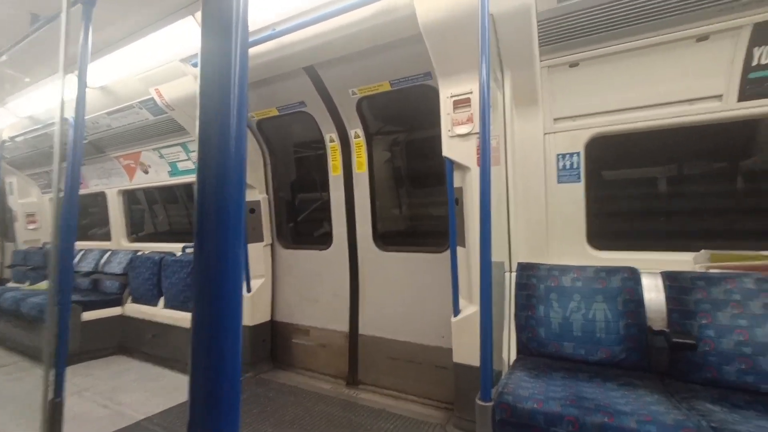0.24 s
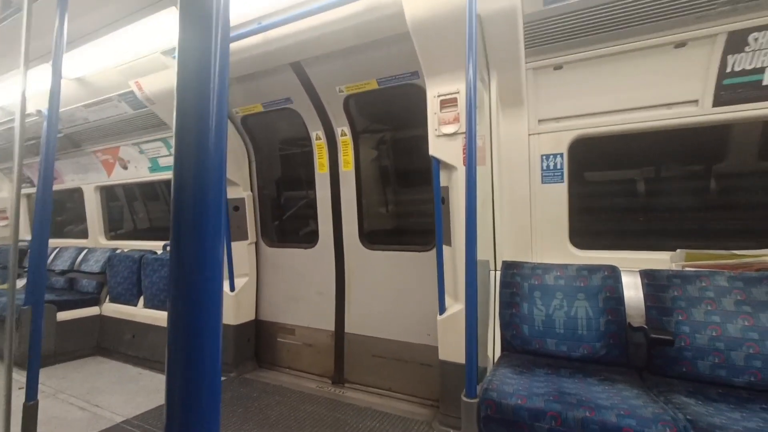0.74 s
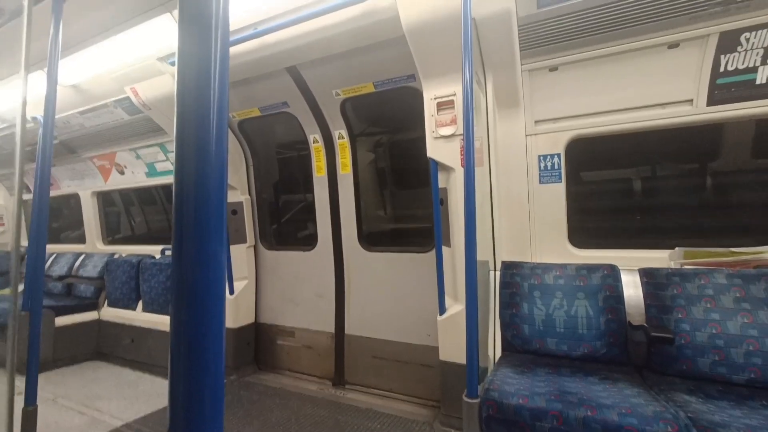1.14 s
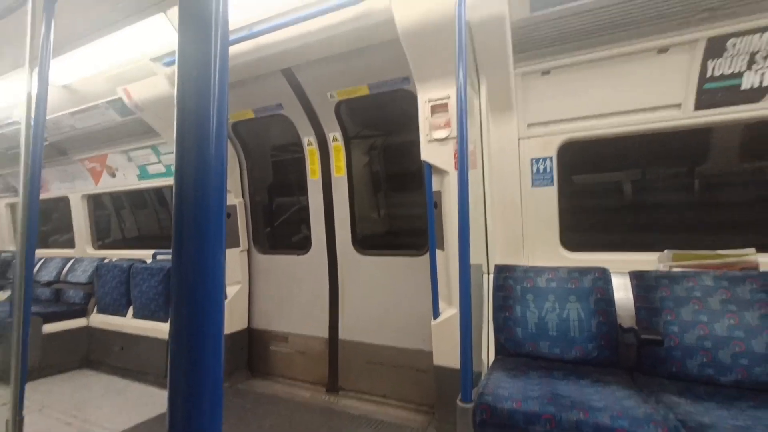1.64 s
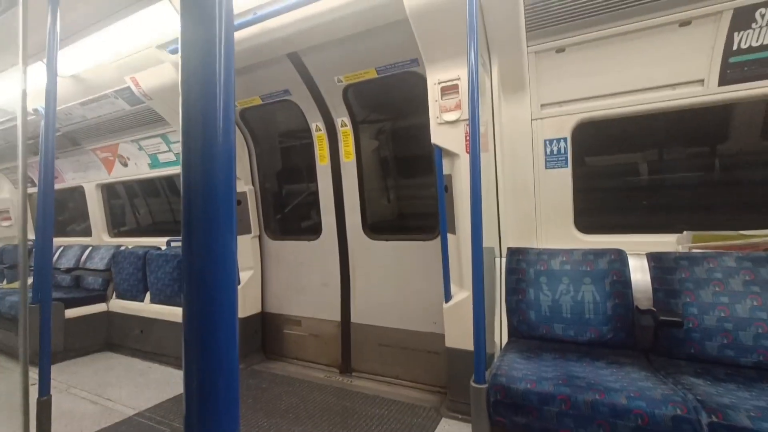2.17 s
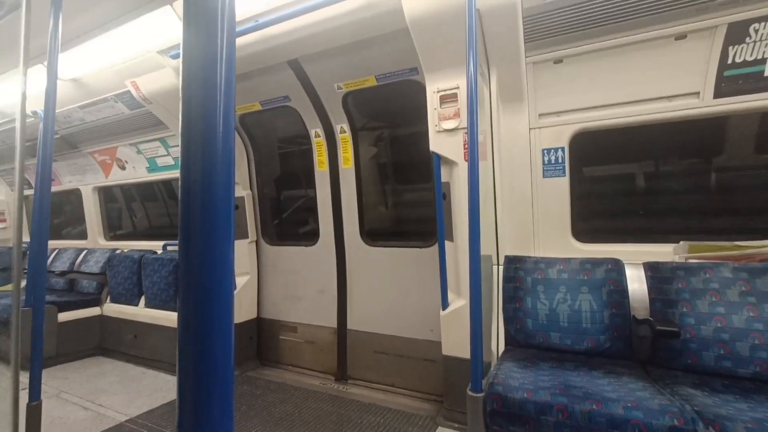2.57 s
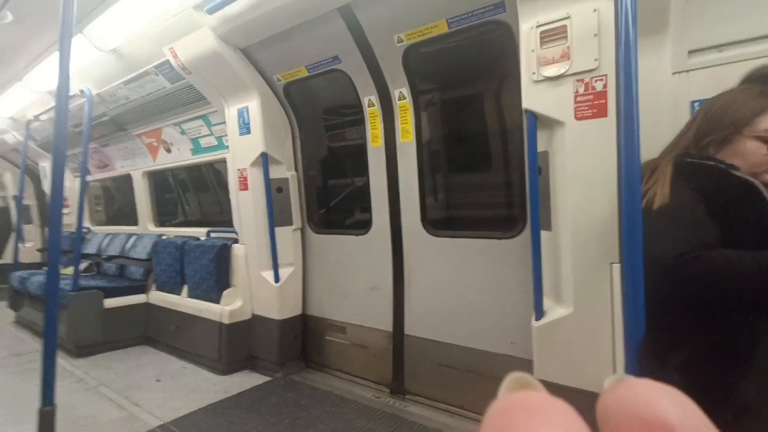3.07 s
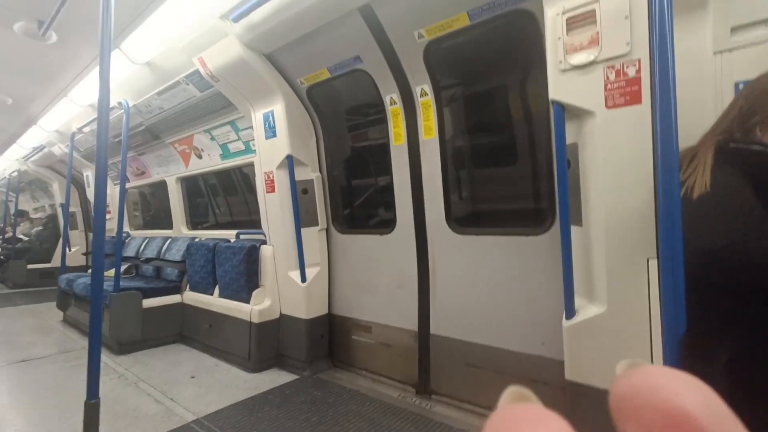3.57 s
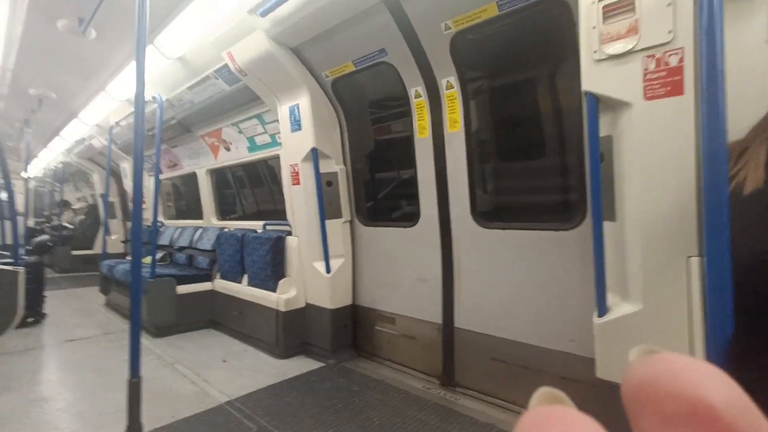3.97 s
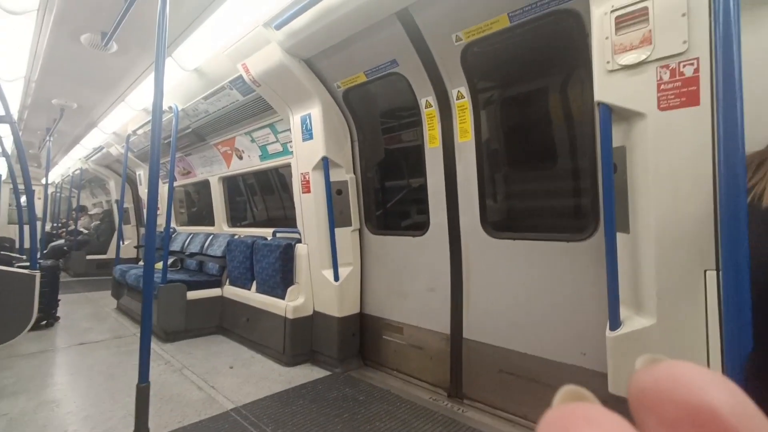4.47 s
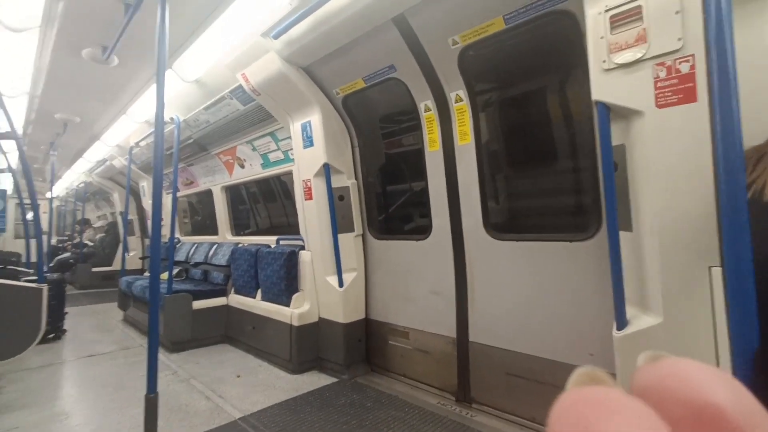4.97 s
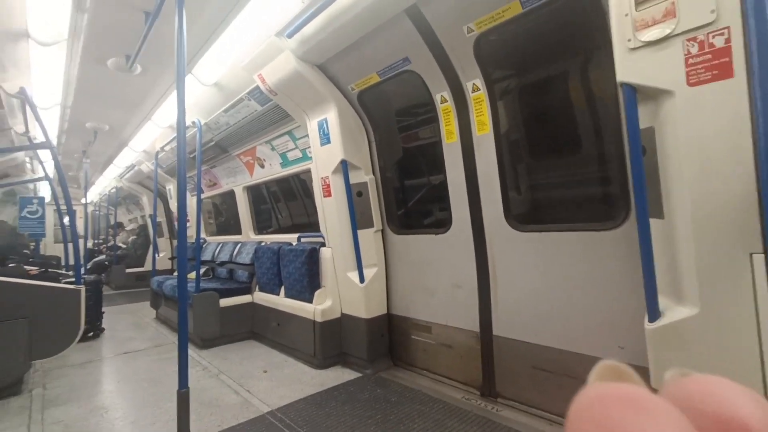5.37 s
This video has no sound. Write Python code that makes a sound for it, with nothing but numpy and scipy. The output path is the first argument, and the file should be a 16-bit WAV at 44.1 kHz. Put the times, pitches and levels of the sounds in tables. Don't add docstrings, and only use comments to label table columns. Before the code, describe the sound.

Inside an underground train carriage, a loud low rumble and tunnel roar, a sudden brief silence, then more roar with a short wheel squeal and sharp knocks.

```python
import sys
import numpy as np
from scipy import signal
from scipy.fft import rfft, irfft, next_fast_len
from scipy.io import wavfile
from scipy.ndimage import uniform_filter1d

SR = 44100
rng = np.random.default_rng(int(sys.argv[2]) if len(sys.argv) > 2 else 0)


def waveform_to_disk(signal):
    frames = np.transpose(np.atleast_2d(signal))
    scaled = np.clip(frames, -1, 1) * 32767
    samples = np.round(scaled).astype(np.int16)
    wavfile.write(sys.argv[1], SR, samples)


N = 247842

# (start [s], end [s])
STRETCHES = [
    (0, 2.7102),
    (3.1872, 5.62),
]
# (frequency [Hz], left minus right [dB])
LEFT_LEAN = [
    [(60, 0), (250, 1), (650, -1.5), (1300, 1), (3500, 0), (5500, -4), (7000, -3.5), (9500, 5), (15000, -3)],
    [(60, 0), (500, 0.5), (1300, 1.5), (3000, 1), (4800, -1), (5800, -16.5), (7200, -19), (8600, -4),
     (12200, -2), (13500, -9.5), (15000, -37)],
]
# (frequency [Hz], likeness [0 to 1])
LIKENESS = [
    [(25, 0.97), (60, 1), (130, 0.98), (290, 0.93), (640, 0.6), (1100, 0.23), (2500, 0.048), (5000, 0.073)],
    [(25, 0.995), (60, 0.95), (130, 0.98), (290, 0.91), (640, 0.52), (1100, 0.081), (2500, 0.035),
     (5000, 0.11)],
]
# (time [s], peak [dB], ring [Hz], time to fall 60 dB [s], left minus right [dB])
TICKS = [(1.7929, -46, 14100, .012, -6), (2.203, -52, 14500, .012, -6), (4.1132, -42, 11800, .045, -6),
         (5.1535, -13, 700, .012, 0), (5.3742, -16, 1000, .01, 0), (5.392, -15, 600, .012, 0),
         (5.3269, -23, 3000, .003, 0), (5.410, -14, 1900, .004, 0), (5.410, -21, 3000, .003, 0),
         (5.45813, -4.5, 1300, .0055, 0), (5.45828, -3, 2250, .003, 0), (5.4584, -13, 3300, .0025, 0),
         (5.5169, -17, 950, .008, 0), (5.5443, -18, 850, .008, 0), (4.1845, -15, 800, .012, 0),
         (5.4583, -19, 6500, .002, 0), (5.4583, -13, 4300, .0025, 0), (5.4583, -21, 9200, .0025, 3),
         (5.4583, -34, 15000, .002, 0)]


def from_db(db):
    return np.exp(np.asarray(db) * np.log(10) / 20)


def rms_one(x):
    return x / np.sqrt(np.mean(x ** 2) + 1e-20)


def in_time(rows, t):
    s, *columns = np.transpose(rows)
    return [np.interp(t, s, column) for column in columns]


def at_hz(points, hz):
    points = np.array(points)
    return np.interp(np.log(hz + 1), np.log(points[:, 0]), points[:, 1])


def drift(rate, count):
    r = np.exp(-80 * np.pi * rate / SR)
    sparse = rng.standard_normal(count // 40 + 2002)
    slow = signal.lfilter([1], [1, -2 * r, r * r], sparse)[2000:]
    return np.interp(np.arange(count) / 40, np.arange(len(slow)), rms_one(slow - slow.mean()))


def swells(rows, t):
    coarse = t[::64]
    total_db = sum(db * np.exp(-4 * ((coarse - s) / length) ** 2) for s, db, length in rows)
    return np.interp(t, coarse, total_db)


def resonate(x, hz, width_hz):
    r = np.exp(-np.pi * width_hz / SR)
    top = np.array([1, 0, -1]) * (1 - r * r) / 2
    return signal.lfilter(top, [1, -2 * r * np.cos(2 * np.pi * hz / SR), r * r], x)


def ringing_mode(noise, hz, width_hz):
    return rms_one(resonate(resonate(noise, hz, width_hz), hz, width_hz))


def rubbed_mode(noise, hz, width_hz, window):
    mode = ringing_mode(noise, hz, width_hz)
    evenness = .8
    power = uniform_filter1d(mode ** 2, size=window)
    return rms_one(mode / (power + .05) ** (evenness / 2))


def stereo_noise(spectrum, k, count, own_db, shared_db, rate, change_db=lambda hz: 0):
    # (frequency [Hz], lead [s])
    left_lead = [
        (900, 0),
        (1500, 3.1e-4),
    ]
    bands_per_octave = 2
    size = next_fast_len(count)
    hz = np.arange(size // 2 + 1) * SR / size
    common, left, right = rfft(rng.standard_normal((3, size)))
    alike = np.clip(at_hz(LIKENESS[k], hz), 0, 1)
    early = np.exp(2j * np.pi * hz * at_hz(left_lead, hz))
    pair = np.sqrt(alike) * common * [early, early ** 0] + np.sqrt(1 - alike) * np.array([left, right])
    louder_left = from_db(at_hz(LEFT_LEAN[k], hz))
    share = np.array([louder_left, louder_left ** 0]) / np.sqrt(1 + louder_left ** 2)
    inside = (hz > spectrum[0][0]) & (hz < spectrum[-2][0])
    pair = pair * share * from_db(at_hz(spectrum, hz)) * inside
    pair = (pair / np.std(irfft(pair.mean(0), size))).astype(np.complex64)

    lowest_hz = spectrum[1][0]
    place = bands_per_octave * np.log2((hz + 1) / lowest_hz)
    bands = int(place[inside].max()) + 1
    place = np.clip(place, 0, bands - 1)
    together_db, out = shared_db * drift(rate, count), 0
    for b in range(bands):
        weight = np.clip(1 - abs(place - b), 0, 1).astype(np.float32)
        band = irfft(pair * weight, size)[:, :count]
        slow_db = change_db(lowest_hz * 2 ** (b / bands_per_octave))
        out = out + band * from_db(slow_db + together_db + own_db * drift(rate, count))
    return out


def fittings_sing():
    # (time [s], pitch [Hz], width [Hz], level [dB rms],
    # length [s])
    sung_modes = [(1.31, 9000, 300, -61, .05), (1.314, 9760, 300, -63.5, .07),
                  (1.31, 13900, 600, -69, 0.064), (1.396, 14720, 900, -66, .03),
                  (1.446, 11500, 1500, -64, .03), (1.505, 7200, 280, -53, 0.086),
                  (1.589, 6540, 300, -51.5, .08), (3.41, 3800, 1600, -44.5, .04),
                  (4.186, 4350, 300, -44, .015), (4.203, 7950, 200, -54, .02),
                  (4.215, 11350, 200, -51, .07), (4.242, 4700, 45, -35.5, .08),
                  (4.217, 2400, 2000, -46, 0.055), (1.362, 6800, 150, -53, .07),
                  (1.664, 6500, 300, -65, .08), (2.583, 1750, 150, -43.5, .15),
                  (0.39, 1900, 120, -43.5, .12), (5.369, 12530, 3000, -63.5, .03),
                  (4.291, 6600, 80, -48, .07), (5.392, 3930, 800, -41, 0.068),
                  (5.524, 6600, 300, -45.5, .04),
                  (.66, 286, 40, -32, 0.12), (0.729, 246.6, 40.3, -16.5, 0.083),
                  (1.197, 346, 40, -34, 0.12), (1.502, 400, 50, -28, 0.092), (1.699, 352, 40, -19.5, 0.11),
                  (1.85, 130.5, 25, -25, 0.1), (1.848, 327, 40, -23.5, 0.11), (2.05, 143.4, 25, -30, 0.089),
                  (2.247, 364, 40, -34, 0.19), (2.45, 351, 40, -26, 0.21), (2.579, 388, 50, -24.5, 0.11),
                  (3.28, 257, 40, -22.5, 0.086), (3.95, 150.5, 30, -20, 0.096), (4.08, 139, 30, -24, .06),
                  (4.098, 291, 40, -24, 0.12), (4.251, 263, 40, -29, 0.1), (4.63, 148, 30, -22.5, 0.048),
                  (5.102, 371, 50, -31.5, 0.13), (5.15, 140, 30, -31, 0.086), (5.4, 200, 40, -26, 0.079),
                  (1.75, 139, 30, -21, 0.12), (2.27, 137, 30, -30, .1), (0.643, 289, 40.2, -24, 0.076),
                  (5.386, 1100, 700, -30.5, .04), (5.413, 1500, 900, -36, 0.034),
                  (1.6, 112, 25, -19, 0.073),
                  (.14, 1330, 40, -44, .12), (.5, 1255, 50, -38, .04), (.57, 1260, 50, -42.5, .04),
                   (.64, 1265, 50, -38, 0.045), (1.97, 1775, 30, -45, .25), (2.58, 1600, 160, -42.5, .2),
                   (4.315, 4790, 70, -46, .07), (4.2, 3060, 100, -43, .05), (1.3, 14000, 700, -64, .05),
                   (1.393, 14300, 1600, -61, .025), (4.203, 4560, 150, -41, .025),
                   (4.7, 4100, 120, -45, .03), (3.8, 760, 200, -31, .05), (4.225, 12600, 500, -55.5, .04),
                   (2.3, 1720, 120, -44, .15), (4.225, 4950, 120, -43, .03), (4.27, 280, 58, -23.5, .12),
                   (1.4, 9000, 1800, -60.5, .03), (3.4, 2600, 1500, -40, .04),
                   (5.33, 3200, 2000, -47, .012)]
    out, t = np.zeros((2, N)), np.arange(-SR // 8, SR // 8) / SR
    for s, hz, width_hz, level_db, length in sung_modes:
        k = int(s > STRETCHES[0][1])
        noise = rng.standard_normal((3, len(t)))
        alike = np.clip(at_hz(LIKENESS[k], hz), 0, 1)
        pair = np.sqrt(alike) * noise[0] + np.sqrt(1 - alike) * noise[1:]
        mode = rubbed_mode(pair, hz, width_hz, 200 + int(2 * SR / hz))
        gain = from_db(level_db + np.array([[at_hz(LEFT_LEAN[k], hz)], [0]]))
        i = round((s + t[0]) * SR)
        out[:, i:i + len(t)] += (mode * gain * np.exp(-4 * (t / length) ** 2))[:, :N - i]
    return out


def ticks():
    out, t = np.zeros((2, N)), np.arange(SR // 8) / SR
    for s, peak_db, hz, t60, pan_db in TICKS:
        i = round(s * SR)
        sides = from_db([[pan_db / 2], [-pan_db / 2]])
        ring = np.sin(2 * np.pi * hz * t) * from_db(peak_db - 60 * t / t60) * sides
        soft_contact = 1 - np.exp(-t / .0004)
        out[:, i:i + len(t)] += (ring * soft_contact)[:, :N - i]
    return out


def motor(t):
    # (time [s], pitch [Hz])
    whine_pitch = [(0, 1594), (.45, 1582), (1.0, 1586), (1.2, 1595), (1.5, 1618), (1.9, 1638), (2.2, 1650),
                   (2.7, 1660)]
    # (time [s], swell [dB], length [s])
    load_surges = [(0, 3, .15), (.4, 9, .16), (.72, -6, .2), (1.07, 7, 0.22), (1.3, -6, .15), (1.5, 5, .2),
                   (1.7, 3, .15), (1.92, 9, 0.22), (2.06, -2, .06), (2.16, 8, 0.1), (2.32, -6, .14),
                   (2.5, -1, .15), (2.66, 4, .12)]
    # (time [s], swell [dB], length [s])
    gear_surges = [
        (.5, 3, 0.29),
        (1.95, 13, 0.41),
        (2.18, 7.7, 0.085),
        (2.42, 4, 0.06),
    ]
    gear_ratio, whine_db, gear_db = .845, -53, -48.5
    hz, = in_time(whine_pitch, t)
    level_db = whine_db + swells(load_surges, t)
    turn = 2 * np.pi * np.cumsum(hz + 8 * drift(40, len(t))) / SR
    housing = ringing_mode(rng.standard_normal((2, len(t))), 1640, 170)
    sides = []
    for phase in (2.2, 0):
        whine = from_db(level_db + 11.0 + drift(8.1, len(t))) * np.sin(turn + phase)
        gear = from_db(gear_db + swells(gear_surges, t)) * np.sin(gear_ratio * turn + phase)
        sides.append(whine + gear)
    return from_db(.5 * level_db - 20.0) * housing + np.array(sides)


def bite(t, s, peak_db, held, fall_db_per_s):
    rise_db = 901 * np.maximum(s - t, 0)
    return from_db(peak_db - rise_db - fall_db_per_s * np.maximum(t - s - held, 0))


def flange_bite(k, t):
    # (time [s], squeal [dB], grinding [dB], held [s])
    bites = [
        [(1.335, -51, -99, .085)],
        [(4.19, -43, -42, .06), (4.29, -55, -55, .03), (5.366, -70, -46, .05)],
    ]
    # (pitch [Hz], width [Hz], level [dB])
    wheel_modes = [
        [(6800, 110, 0), (6500, 150, -8)],
        [(3705, 90, -8), (4330, 200, -5), (4695, 40, -6), (4790, 80, -6), (5020, 150, -13), (6600, 90, 4),
         (6705, 90, 1), (7100, 50, -4), (7380, 50, -11), (11390, 70, -18)],
    ]
    # (frequency [Hz], level [dB per Hz])
    grind_colour = [(1500, 7), (2200, 15), (4000, 17.5), (5200, 11.5), (6000, -25), (7000, -37)]
    squeal = 0
    for hz, width_hz, level_db in wheel_modes[k]:
        mode = rubbed_mode(rng.standard_normal((2, len(t))), hz, width_hz, 200)
        lean_db = at_hz(LEFT_LEAN[k], hz)
        squeal = squeal + mode * from_db(level_db + 4.5 * drift(17, len(t)) + [[lean_db], [0]])
    grind = stereo_noise(grind_colour, k, len(t), own_db=2, shared_db=1, rate=30) if k else 0
    out = 0
    for s, squeal_db, grind_db, held in bites[k]:
        out = out + bite(t, s, squeal_db, held, 164.5) * squeal
        out = out + bite(t, s, grind_db, held, 298) * grind
    return out


def swell_near(t, hz):
    # (time [s], middle pitch [Hz], swell [dB], length [s])
    pitch_swells = [(0.144, 65, 19, 0.06), (0.332, 113.5, 8.5, 0.17), (0.543, 111.6, 4.5, 0.26),
                    (0.641, 273, 7.5, 0.1), (0.722, 175.7, 0, 0.11), (.8, 113, -1, 0.063),
                    (0.897, 298, -14, 0.12), (0.95, 112, 4.5, 0.1), (1.163, 135, 6.5, 0.28),
                    (1.192, 59.4, -31, 0.087), (1.45, 173, 10, 0.032), (1.574, 107.4, -5, 0.038),
                    (1.848, 114, 9, 0.12), (1.92, 59.9, 14.5, 0.15), (2.32, 220, -17, 0.042),
                    (2.403, 342, 10.5, 0.044), (2.561, 141, 14, 0.092), (3.277, 153, 14, 0.1),
                    (3.723, 192, 7.5, 0.72), (3.87, 198, -45, 0.047), (4.036, 127, 15.5, 0.16),
                    (4.35, 166, 15, 0.044), (4.46, 112, -4, 0.065), (4.537, 108, 6, 0.052),
                    (4.723, 120.5, 12, 0.18), (5.12, 120, 5.5, 0.068), (5.072, 205, -11, 0.052),
                    (5.247, 300, -7, 0.062), (5.356, 443, 7, 0.29), (.05, 70.4, 10, .08),
                    (0.724, 250, 5.5, 0.11), (1.199, 328, 8, 0.055), (1.2, 82, -3, 0.11),
                    (1.626, 160, -11, 0.094), (2.055, 140, 8, 0.13), (2.291, 59.8, 9, 0.065),
                    (2.43, 170, 1, .08), (1.68, 368, 4.5, 0.077), (3.3, 70, 8, .1), (3.9, 85, 11, 0.093),
                    (4.07, 140, 5.5, 0.046), (4.65, 145, 5, 0.065), (5.15, 145, 10, .1), (5.4, 200, 3, .12),
                    (5.6, 150, -8.5, 0.033),
                    (0.456, 3500, 3, .2), (0.503, 900, 1, 0.14), (.7, 2500, 5, 0.1), (1.05, 281, 10, .12),
                    (1.051, 786, 4, .07), (1.275, 121, 1.5, 0.12), (1.346, 232, 4.5, 0.11),
                    (1.402, 2480, -2, 0.11), (1.693, 285, -6, 0.08), (2.02, 383, 6, 0.4),
                    (2.096, 3060, 3, 0.22), (2.138, 234, -10, 0.11), (2.15, 1320, 3.5, 0.18),
                    (3.327, 254, 4.5, 0.22), (3.406, 3280, 2.5, .08), (3.447, 80, 6, 0.19),
                    (3.93, 149, 1, .08), (2.4, 160, 5.5, .1), (3.517, 396, -7, 0.51),
                    (3.53, 770, 7.5, 0.12), (4.135, 287, 3.5, 0.11), (4.222, 2930, 6, 0.066),
                    (4.227, 1200, 5, 0.045), (4.381, 636, 5.5, 0.13), (4.79, 696, 0.5, 0.19),
                    (5.164, 750, 6, 0.037), (5.413, 4060, 7, .07), (1.279, 150, -9, 0.11),
                    (3.547, 150, -8.5, 0.069), (.3, 150, -7.5, 0.13), (3.956, 210, -4.5, 0.2),
                    (1.15, 90, -4, 0.11), (4.297, 60, -8, .08)]
    spread = 0.31
    rows = []
    for s, middle_hz, db, length in pitch_swells:
        nearness = np.exp(-(np.log2(hz / middle_hz) / spread) ** 2)
        rows.append((s, db * nearness, length))
    return swells(rows, t)


def rolling(k, t):
    # (frequency [Hz], level [dB per Hz])
    rumble_colour = [
        [(12, -52.5), (20, -27), (33, -24), (53, -7), (81, -9), (123, -1), (210, -5), (236, -9), (270, -7.5),
         (313, -9.5), (348, -8), (448, -16.5), (544, -23), (700, -35.5), (910, -34.5), (1540, -120)],
        [(12, -52), (20, -23), (33, -19.5), (49, -6), (75, -6.5), (123, -2.5), (178, -5), (213, -2),
         (287, -6.5), (380, -4), (475, -15), (520, -12), (700, -22.5), (910, -49), (1540, -120)],
    ]
    roar_colour = [
        [(260, -12.5), (450, -6.5), (536, 0), (746, -10), (1350, -13), (1460, -14.5), (1630, -14.5),
         (1870, -16), (2360, -19), (5140, -34.5), (6200, -35), (8060, -68.5), (13600, -120)],
        [(260, -36), (450, 2.5), (481, -3), (548, -2), (796, -2), (1060, -8), (1300, -8.5), (1700, -13.5),
         (4180, -26), (5490, -34), (6200, -30), (8060, -64), (13600, -120)],
    ]
    ring_colour = [
        [(3060, -32), (5200, -15.5), (6740, 2.5), (7090, -2.5), (7400, -5), (9000, -16.5), (11700, -53.5),
         (19800, -120)],
        [(3060, 1.5), (5200, 2), (5700, -14), (6850, 5.5), (8010, -12.5), (9000, -21.5), (11700, -61),
         (19800, -120)],
    ]
    hiss_colour = [
        [(4710, -33), (8000, -0.5), (8780, -10), (10100, -2), (10500, -5.5), (11700, -4), (13900, -8),
         (15400, -15)],
        [(4710, -41.5), (8000, 0), (8290, -4.5), (8950, -5), (10400, -6), (11500, -2.5), (14600, -8),
         (15400, -16)],
    ]
    # (time [s], level [dB])
    rail_roughness = [
        [(0, -25.5), (.28, -31.5), (.55, -26), (.88, -31.5), (1.2, -29), (1.5, -25.5), (1.75, -30.5),
         (2.28, -33), (2.71, -35)],
        [(3.19, -30), (3.5, -24.5), (3.84, -28), (4.15, -24), (4.5, -28.5), (4.8, -25.5), (5.1, -30),
         (5.33, -32), (5.62, -26.5)],
    ]
    # (rumble [dB], its fading [dB per s], ring [dB], hiss [dB], fading of both [dB per s])
    steady_levels = [
        (-15.5, 0.48, -58, -71.5, 0.95),
        (-17.5, 0.5, -52, -63.5, 2),
    ]
    # (time [s], swell [dB], length [s])
    joints = [(.08, 0.5, 0.05), (.38, 4, 0.085), (.93, 5.5, 0.047), (1.045, 7, 0.083), (1.32, 1, 0.04),
              (1.56, 2.5, 0.0967), (1.8, 4, 0.04), (1.96, 4.5, 0.16), (2.42, 4.5, 0.057), (2.6, 5.5, 0.2),
              (3.27, 7, 0.22), (3.41, 7, 0.09), (3.58, 1.5, 0.24), (3.93, 4.5, 0.1), (4.62, 1.5, 0.28),
              (5.18, 2, 0.11), (5.39, 8, 0.12), (5.53, 3, 0.13)]
    # (time [s], swell [dB], length [s], share that rings the wheel)
    rubs = [(0.057, 3, 0.091, 0.61), (0.63, 4, 0.17, .7), (1.049, -0.5, .08, 0.71), (1.315, 4, 0.078, 1.5),
            (1.401, 8, 0.077, 1), (1.452, 7, 0.042, 0.97), (1.592, 2, 0.11, 1.6), (1.899, 3.5, 0.19, 0.81),
            (2.575, 5, 0.11, 0.4), (3.254, 8.5, 0.22, 0.7), (3.404, 4.5, 0.031, 0.29),
            (3.59, 4.5, 0.088, 1.2), (3.698, 4, 0.16, 1.3), (3.947, 6.5, 0.2, 0.84),
            (4.225, 18, 0.17, 0.68), (4.371, 6.5, 0.18, 0.97), (4.607, 7, 0.24, 1.2),
            (4.762, 0.5, 0.13, 0.5), (5.203, 2.5, 0.047, .1), (5.404, 8.5, 0.065, 0.59),
            (5.523, 4, 0.095, 1.2), (5.614, 9.5, .05, .3)]
    # (low [Hz], high [Hz])
    treble_hz = [
        1100,
        3200,
    ]

    rail_db, = in_time(rail_roughness[k], t)
    swing_db, run, n = rail_db - rail_db.mean(), t - t[0], len(t)
    floor_db, floor_fade, ring_db, hiss_db, flange_fade = steady_levels[k]
    joint_db = swells(joints, t)
    rub_db = swells([row[:3] for row in rubs], t)
    rung_db = swells([(s, db * share, length) for s, db, length, share in rubs], t)
    bright_db = 0.34 * rub_db - 0.76 * joint_db - 0.58 * swing_db
    flange_db = 0.17 * swing_db - flange_fade * run
    rumble_db = floor_db - floor_fade * run + 0.38 * swing_db

    def roar_change(hz):
        return swell_near(t, hz) + bright_db * np.interp(np.log(hz), np.log(treble_hz), [0, 1])

    rumble = stereo_noise(rumble_colour[k], k, n, own_db=2.0, shared_db=0.0, rate=11.5,
                          change_db=lambda hz: swell_near(t, hz))
    roar = stereo_noise(roar_colour[k], k, n, own_db=1.0, shared_db=0.1, rate=17, change_db=roar_change)
    ring = stereo_noise(ring_colour[k], k, n, own_db=0.4, shared_db=0.5, rate=9.7)
    hiss = stereo_noise(hiss_colour[k] + [(SR / 2, -60)], k, n, own_db=1.2, shared_db=.7, rate=16)
    out = from_db(rumble_db) * rumble
    out = out + from_db(rail_db + joint_db - 1.5) * roar
    out = out + from_db(ring_db + flange_db + rung_db + 0.65) * ring
    return out + from_db(hiss_db + flange_db + rub_db + 3.0) * hiss


def scene():
    out = ticks()
    for k, (start, end) in enumerate(STRETCHES):
        i, j = round(start * SR), min(round(end * SR), N)
        t = np.arange(i, j) / SR
        out[:, i:j] += rolling(k, t) + flange_bite(k, t)
        if k == 0:
            out[:, i:j] += motor(t)
    end, start = (round(s * SR) for s in np.ravel(STRETCHES)[1:3])
    more = 2048
    out[:, end:end + more] = out[:, end - more:end][:, ::-1]
    out[:, start - more:start] = out[:, start:start + more][:, ::-1]
    return out + fittings_sing()


def coarse_treble(x):
    # (frequency [Hz], step [dB])
    step_size = [(1500, -51), (3000, -50), (5000, -57), (7000, -63), (8200, -52), (9600, -48), (10500, -40),
                 (11200, -52), (15000, -56), (15500, -44)]
    # (frequency [Hz], share)
    step_follows = [
        (2000, 0),
        (4000, .35),
        (7000, .35),
        (8200, .55),
    ]
    hop, offset, lines_per_band = 1024, 599, 8
    frames = N // hop + 2
    padded = np.pad(x, ((0, 0), (2 * hop - offset, 2 * hop))).astype(np.float32)
    n, line = np.arange(2 * hop) + .5, np.arange(hop) + .5
    window = np.sin(np.pi * n / (2 * hop))
    basis = window * np.cos(np.pi / hop * np.outer(line, n + hop / 2)) * np.sqrt(2 / hop)
    basis = basis.astype(np.float32)
    frame_start = np.arange(frames)[:, None] * hop
    lines = padded[:, frame_start + np.arange(2 * hop)] @ basis.T

    scatter = rng.standard_normal((2, frames, hop // lines_per_band))
    scatter = np.repeat(scatter, lines_per_band, axis=2)
    scatter = (scatter + np.roll(scatter, 1, axis=1))[:1] / np.sqrt(2)
    line_hz = line * SR / (2 * hop)
    later = frame_start > STRETCHES[1][0] * SR
    base_db = at_hz(step_size, line_hz) + 2 * later
    nearby_power = uniform_filter1d(lines ** 2, size=33, axis=2)
    masking_db = 10 * np.log10(nearby_power + 1e-12) + 10.5
    step = from_db(base_db + at_hz(step_follows, line_hz) * (masking_db - base_db) + 6.5 * scatter)
    attacks = (np.array(TICKS)[:, 0] * SR - offset).astype(int) // hop + 1
    step[:, np.append(attacks, attacks + 1)] *= from_db(-9)
    rounded = step * np.sign(lines) * np.floor(abs(lines) / step + .4)
    back = rounded.astype(np.float32) @ basis
    joined = back[:, 1:, :hop] + back[:, :-1, hop:]
    return joined.reshape(2, -1)[:, hop - offset:hop - offset + N].astype(float)


def top_cut(x):
    return signal.sosfilt(signal.butter(12, 15530, fs=SR, output="sos"), x)


def record(dry):
    t = np.arange(N) / SR
    first_end, second_start = STRETCHES[0][1], STRETCHES[1][0]
    fade_out = (first_end - t) / .0007 + .2 * np.sign(first_end - t)
    fade_in = (t - second_start) * SR
    kept = np.clip(np.maximum(fade_out, fade_in), 0, 1)
    rounded_peaks = 1.238 * np.tanh(dry / 1.224)
    return top_cut(kept * coarse_treble(rounded_peaks))


dry = scene()
out = record(dry)
waveform_to_disk(out)
```